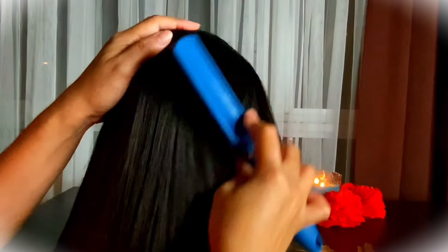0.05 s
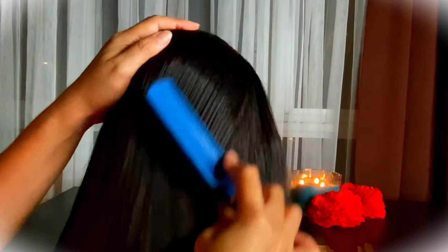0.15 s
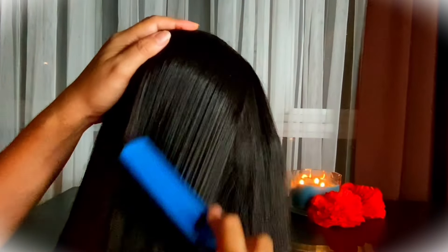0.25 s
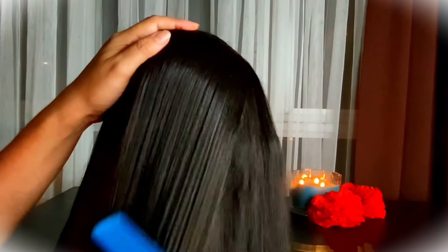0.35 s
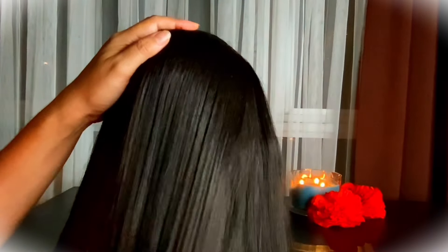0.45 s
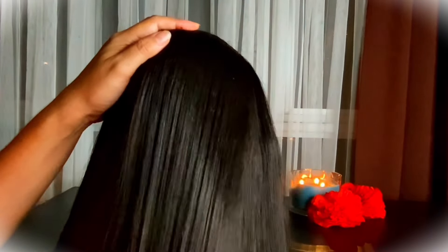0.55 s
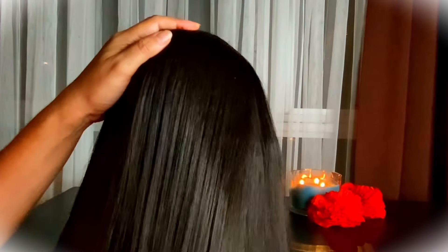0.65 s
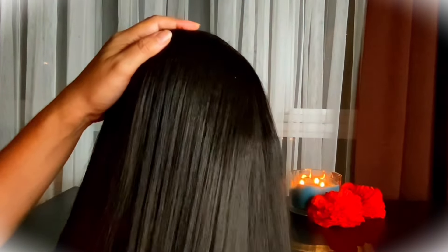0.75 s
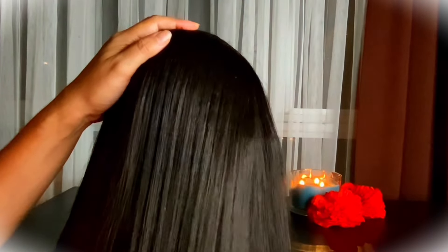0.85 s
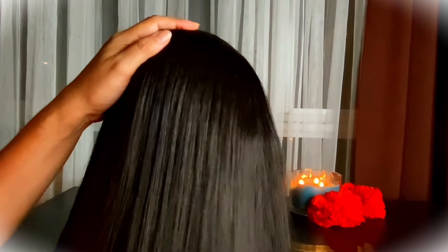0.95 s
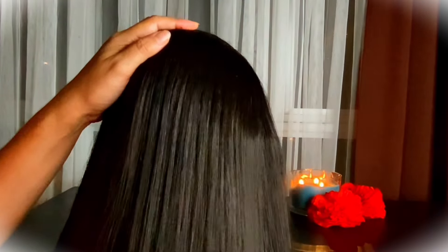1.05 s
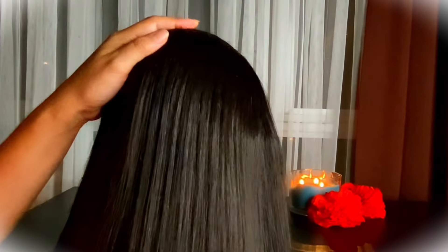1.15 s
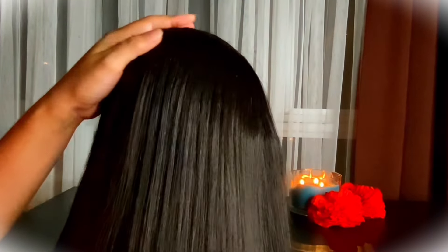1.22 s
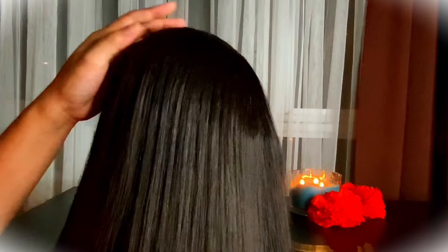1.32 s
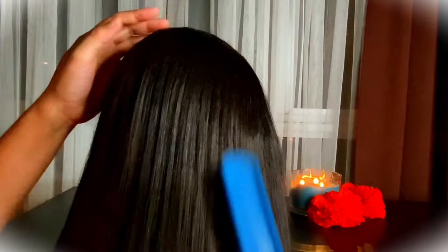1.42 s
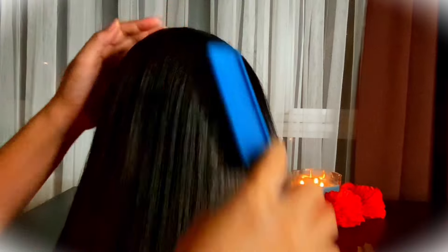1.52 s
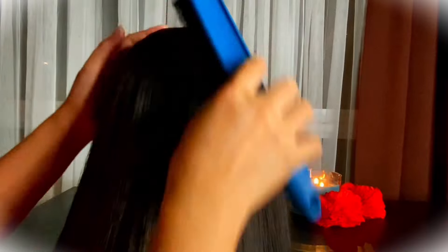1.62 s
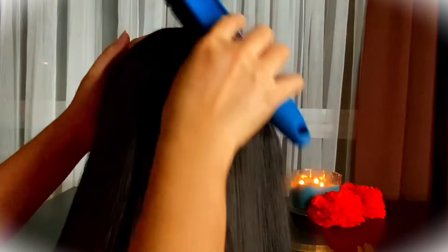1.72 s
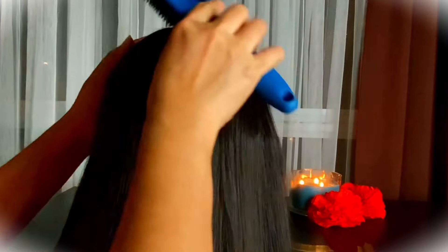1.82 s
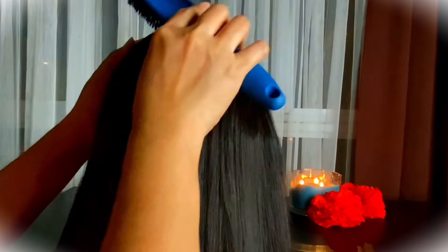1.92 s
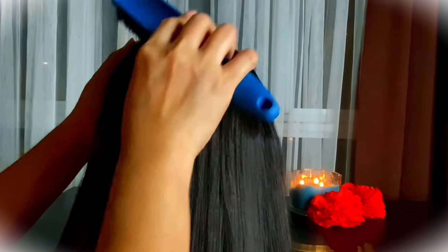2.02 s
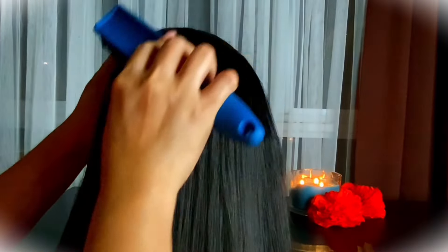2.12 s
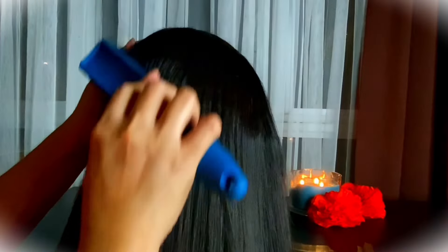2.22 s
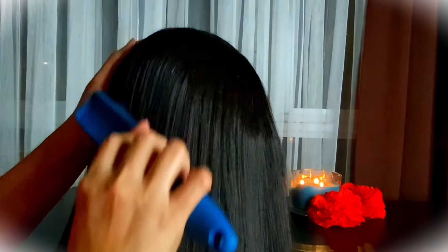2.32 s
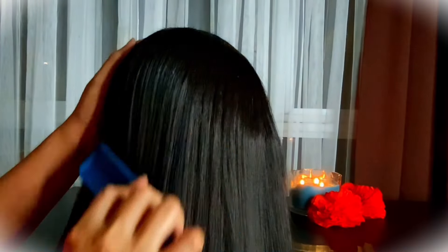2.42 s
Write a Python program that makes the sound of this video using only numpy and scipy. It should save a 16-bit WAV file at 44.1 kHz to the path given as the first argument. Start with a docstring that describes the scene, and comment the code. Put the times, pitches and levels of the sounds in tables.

```python
"""A quiet room, with a plastic comb drawn through long hair close to a two-port microphone: the end of one
stroke, a fast sweep past the microphone, a faint brush of the hand, a pause and the start of the next stroke.
Strands slip off the teeth as a grainy hiss made of short decaying sines and noise, which also drives the comb's
rasp; snagged teeth tick as scratches that ring the comb's modes. Stirred air buffets the ports as low noise,
flutter and sharp pressure puffs, over a steady microphone hiss."""
import sys
import numpy as np
from scipy import signal
from scipy.fft import rfft, irfft, next_fast_len
from scipy.io import wavfile
from scipy.ndimage import map_coordinates

SR = 44100
rng = np.random.default_rng(int(sys.argv[2]) if len(sys.argv) > 2 else 0)


def log_audio(samples):
    """Write samples as a 16-bit WAV file to the path given in sys.argv[1]."""
    # one column per channel
    frames = np.atleast_2d(samples).T
    # limit to full scale, then quantise
    limited = np.clip(frames, -1, 1)
    pcm = np.round(limited * 32767).astype(np.int16)
    wavfile.write(sys.argv[1], SR, pcm)


N = 110250

# Spectrum of the microphone hiss. Each row: frequency in Hz, relative level in dB.
HUSH_SPECTRUM = [(350, -38), (600, -13), (800, 0), (918, -5.5), (2530, -10), (14400, -12.5), (15900, -18)]
# Air on the ports, before the trims in air(). Each row: time in seconds, low buffeting in dB, flutter in dB,
# flutter left over right in dB.
AIR_MOVES = [(0.0, -48, -53.5, 8.5), (0.03, -45.5, -59, 2), (0.15, -44, -48, -0.5), (0.24, -30.5, -49, 7),
             (0.28, -31.5, -43, -0.5), (0.3, -30.5, -39.5, 13), (0.33, -25, -36.5, 4),
             (0.36, -26.5, -36, 7), (0.395, -27, -36, 7), (0.42, -26, -38.5, 8), (0.45, -28, -39.5, 5),
             (0.48, -25, -41, 2), (0.51, -32.5, -44.5, 2), (0.55, -23, -40, 0), (0.61, -30.5, -47, -5),
             (0.63, -27, -45, 2), (0.68, -29, -46, 0), (0.705, -35, -52, 0), (0.73, -31, -48, 0),
             (0.78, -38, -51.5, -0.5), (0.82, -33, -51.5, -3.0), (0.855, -36, -46, 2.5),
             (0.875, -40, -51, 0), (0.9, -35, -52, 0), (0.93, -44, -57, 0), (0.966, -50, -61, 0),
             (1.01, -47, -58, 0), (1.06, -52, -60, 2), (1.12, -56, -66, 0), (1.19, -59, -70, 0),
             (1.225, -51, -62, 0), (1.3, -55, -65, 0), (1.89, -54.5, -68.5, 1.5), (1.93, -53.5, -66, 5.0),
             (1.99, -52, -60, 1), (2.06, -49, -53, 1), (2.14, -54, -58, 1), (2.23, -53, -54, 0.5),
             (2.32, -47, -55, 0), (2.36, -52, -57, 0), (2.44, -50, -59, 2), (2.5, -48, -56, 1.0)]
# Spectra of the low buffeting and of the flutter. Each row: frequency in Hz, relative level in dB.
BUFFET_SPECTRUM = [(8.8, -11), (15, 1), (59, -3.5), (70, -2.5), (108, -11.5), (160, -20), (210, -45),
                   (350, -120)]
FLUTTER_SPECTRUM = [(71, -32), (120, 0), (156, -3.5), (343, -11), (840, -27), (1200, -32), (1560, -45),
                    (2640, -120)]
# Sharp puffs on the ports. Each row: time in seconds, nominal width in ms, relative left pressure,
# relative right pressure.
AIR_PUFFS = [(.3105, 1.8, .05, .13), (.3335, .9, .1, .04), (.3378, 2.2, -.24, -.1), (.3422, .8, .13, .05),
             (.3582, .5, -.08, 0), (.3753, .5, .12, 0), (.391, .7, -.15, 0), (.3545, 2.6, .25, .12),
             (.363, 1.6, -.2, 0), (.3711, 1.3, .36, 0), (.3785, .5, .52, .08), (.3825, 2, -.1, -.2),
             (.3873, 1.4, .15, 0), (.4046, .7, .7, -.31), (.4092, 1.5, .26, .05), (.4257, .8, .18, 0),
             (.4494, .6, .36, -.2), (.4522, 2.2, .24, -.08), (.5337, 2.5, -.17, -.08),
             (.5597, 1.8, .08, .22)]
# Teeth snagging. Each row: start in seconds, peak in dB, pitch in Hz, scratch length in seconds (a 30 dB fall).
SNAGGED_TEETH = [(.4035, -31, 3100, .004), (.4487, -27, 5600, .006), (.503, -29, 3000, .004),
                 (.5203, -26, 3400, .004), (.5445, -29, 6000, .006), (.5590, -26, 7500, .005),
                 (.5733, -26, 5600, .004), (.606, -29, 6000, .006), (.6235, -32, 4200, .006),
                 (.652, -33, 4200, .005), (.6875, -35, 3500, .008), (.718, -36, 4500, .008),
                 (.7755, -38, 4200, .008), (.776, -40, 11000, .006), (.808, -44, 3100, .006),
                 (.856, -45, 2500, .008), (.965, -56, 2800, .012), (1.0095, -54, 3800, .02),
                 (1.885, -57, 1500, .01), (1.975, -50, 1500, .015), (2.0215, -47, 1400, .01),
                 (2.077, -42, 1700, .004), (2.0895, -43, 5600, .006), (2.0905, -39, 1600, .016),
                 (2.110, -45, 1500, .004), (2.1345, -47, 1500, .008), (2.155, -46, 1500, .005),
                 (2.1685, -46, 1500, .006), (2.174, -45, 2800, .008), (2.2475, -46, 1600, .01)]
# Ringing modes of the comb. Each row: frequency in Hz, bandwidth in Hz, mean level in dB.
COMB_MODES = [(1500, 300, -2), (2000, 500, -2), (3100, 800, 0), (4200, 900, 0), (5600, 1100, 0),
              (8000, 1800, 2), (12000, 3000, 3)]
# Spectra of the comb's rasp, the strand hiss and the top treble. Each row: frequency in Hz, relative dB per Hz.
RASP_SPECTRUM = [(290, -30), (450, -5.5), (651, -1.5), (960, -2.5), (1070, -2.5), (1270, -10), (1480, -2.5),
                 (1700, -7.5), (2000, -6), (2570, -11.5), (2800, -16), (3200, -17), (4160, -26),
                 (7040, -120)]
HISS_SPECTRUM = [(1290, -37), (2200, -11), (2500, -4.5), (3020, 2.5), (4890, 2.5), (6620, 4.5),
                 (10000, -1.5), (13000, -31), (22000, -120)]
TOP_SPECTRUM = [(5290, -13), (9000, 0), (13400, 4.5), (15200, 1.5), (15900, -18)]
# First stroke and sweep, a faint brush of the hand, the next stroke. Each row: time in seconds, comb rasp in
# dB, strand hiss in dB, top treble in dB, left over right in dB, place from 0 (up on the head) to 1 (at the
# microphone).
SWEEP_MOVES = [(0, -49.5, -45.5, -53.5, -3.5, 0.034), (.07, -51, -47, -50.5, -5, 0),
               (.138, -50, -48.5, -50.5, -3.5, 0.19), (.214, -65, -52.5, -53, -3.5, 0.25),
               (.29, -53.5, -48, -45.5, -3, 0.22), (.36, -49, -44, -44, 4.5, 0.24),
               (.41, -46, -42, -40, 5, 0.52), (.448, -52.5, -42, -41, 2, 0.97),
               (.478, -52.5, -44, -46.5, 0, 1), (.56, -49, -40, -44.5, -0.5, 0.92),
               (.628, -49, -45, -46, 0.5, 1), (.654, -57, -47, -49.5, 0, 1),
               (.664, -53, -49, -52.5, -0.5, 1), (.7, -59, -51.5, -60.5, 0.5, 1),
               (.76, -61, -56.5, -66.5, 0, 0.92), (.86, -64.5, -56.5, -81, -1, 1),
               (.89, -70, -61.5, -75, 0, 0.75), (.94, -80, -74.5, -78, 0, 0.5),
               (1.0, -79, -74, -96.5, 0, 0.74)]
SWISH_MOVES = [(1.13, -76, -91, -87, 0, 0.75), (1.21, -77, -74.5, -85, 0, 0.81), (1.3, -86, -86, -92, 0, 1)]
RESTART_MOVES = [(1.8, -81, -102, -100, 6, 0), (1.88, -69.5, -81, -96, -1, 0.028),
                 (1.955, -66.5, -71.5, -91, -4, 0), (1.98, -61, -63, -91, -4.5, 0),
                 (2.03, -58.5, -61.5, -75, -3, 0), (2.09, -54, -58, -64, -1.5, 0.075),
                 (2.13, -55.5, -60.5, -60, 0.5, 0.022), (2.2, -52.5, -54.5, -60.5, -1, 0.019),
                 (2.284, -55.5, -55.5, -53.5, 1, 0.078), (2.34, -64.5, -55.5, -54.5, 2, 0.28),
                 (2.424, -72, -55.5, -54, 1.5, 0.24), (2.5, -62.5, -55.5, -55, 5.5, 0.13)]
# How the ports pick up each place. Each row: frequency in Hz, likeness of the two ports from 0 to 1,
# phase of right against left in radians, left over right in dB, colour in dB.
PICKUP_ON_HEAD = [(900, 1, 1, 6, -1.5), (2110, 0.8, -0.36, 2, 0.5), (3120, 0.9, 1.8, -1, -2),
                  (4320, 0, -8, 5, -4), (5350, 0.3, 4.5, 9, 1.5), (5850, 0.4, -2.2, 0.5, 1.5),
                  (7030, 0.34, -2, -2.5, 0), (8350, 0.84, -3.5, 1, 5), (10000, 0.54, -3, 1, -6.5),
                  (13000, 1, -1, 8, -6), (15400, 0.75, 11.5, -7, -8)]
PICKUP_IN_FRONT = [(900, 1, 0.41, 1, 0.014), (2000, 1, 0, 0, 0), (5750, 1, 0, 0.16, 0),
                   (8000, 0.62, 0.032, 1, 0.02), (11800, 0.21, 1, 0.35, 0), (15000, 0.45, 0.43, 0.83, 0)]

HUSH_DB = -70
SHARED_AIR = 0.1  # share of the low buffeting's power common to both ports, before its lumps
PORT_DELAY_MS = 0.81  # a puff reaches the right port this much later
PUFF_POINT = 1.8  # 2 is a rounded crest, 1 a sharp one
OFF_PITCH_DB = 34  # loss of a mode one octave from the snag's pitch
SCRATCH = 0.18  # noise in a snag, against a first click of 1
SLIPS_PER_S, SLIP_SPREAD_DB = 4000, 3
SLIP_CYCLES = 2.15  # a slip falls by a factor of e in half this many cycles
HEAD_GRAIN, FRONT_GRAIN = 0.27, 0.36  # share of slips in the friction noise
# Strands catching on the teeth: rate, size over the steady rub, fade in seconds.
CATCHES_PER_S, CATCH_DB, CATCH_FADE_S = 160, -10.5, 0.0034
TOP_HZ = 15870  # band limit


def amp(db):
    """Amplitude ratio of a level in dB."""
    return 10 ** (np.asarray(db) / 20)


def unit(x):
    """The sound scaled to rms 1 over all channels."""
    return x / np.sqrt(np.mean(x ** 2) + 1e-20)


def along(points, hz):
    """Value at each frequency, read between (Hz, value) points on a log axis."""
    f, v = np.transpose(points)
    return np.interp(np.log(hz + 1), np.log(f + 1), v)


def curves(rows):
    """One value per sample for each column after the time."""
    s, *cols = np.transpose(rows)
    return [np.interp(np.arange(N) / SR, s, c) for c in cols]


def wobble(rate):
    """Two smooth random curves, with rate knots a second."""
    knots = rng.standard_normal((2, 1000))
    return np.array([map_coordinates(k, [np.arange(N) * rate / SR]) for k in knots])


def filtered(x, response):
    """The sound times a complex response of frequency."""
    m = next_fast_len(N + 8192)
    spectrum = rfft(x, m) * response(np.fft.rfftfreq(m, 1 / SR))
    return irfft(spectrum, m)[..., :N]


def coloured(x, spectrum):
    """The sound shaped by a spectrum, rms 1."""
    return unit(filtered(x, lambda hz: amp(along(spectrum, hz))))


def sides(pan_db):
    """Left and right gains for a level difference in dB."""
    return amp(np.array([pan_db, -pan_db]) / 2)


def hush():
    """Steady microphone hiss, independent at each port."""
    return amp(HUSH_DB) * coloured(rng.standard_normal((2, N)), HUSH_SPECTRUM)


def puffs():
    """Pressure pulses over a broad, weak opposite swell, later and wider at the right port."""
    out = np.zeros((2, N))
    t = np.arange(N) / SR
    for s, ms, left, right in AIR_PUFFS:
        for port, gain, at, wide in ((0, left, s, 0.79), (1, right, s + PORT_DELAY_MS / 1000, 1.37)):
            u = (t - at) / (wide * ms / 1000)
            crest = np.exp(-np.abs(u) ** PUFF_POINT * .6)
            swell = .2 * np.exp(-u ** 2 / 18)
            out[port] += gain * (crest - swell)
    return out


def air():
    """Lumpy turbulence from air pushed by the hand, different at each port, with a few sharp puffs."""
    low_db, flutter_db, pan_db = curves(AIR_MOVES)
    separate = rng.standard_normal((2, N))
    shared = np.sqrt(SHARED_AIR / (1 - SHARED_AIR)) * rng.standard_normal(N)
    low = unit(amp(2.2 * wobble(11.43)) * coloured(separate + shared, BUFFET_SPECTRUM))
    lumps = amp(2.47 * wobble(70))
    flutter = unit(lumps * coloured(rng.standard_normal((2, N)), FLUTTER_SPECTRUM))
    return amp(low_db + 2.5) * low + amp(flutter_db + 4.5) * flutter * sides(pan_db) + puffs()


def snags():
    """Each snag is a short scratch that rings the comb's modes, mostly those near its own pitch."""
    size = 1200  # samples in one tick
    out = np.zeros(N + size)
    t = np.arange(size) / SR
    for s, db, pitch, length in SNAGGED_TEETH:
        ring = np.zeros(size)
        for hz, width, level in COMB_MODES:
            mode_db = level - OFF_PITCH_DB * np.log2(hz / pitch) ** 2 + rng.normal(0, 1)
            ring += amp(mode_db) * np.sin(2 * np.pi * hz * t) * np.exp(-np.pi * width * t)
        rub = amp(-30 * t / length) * (SCRATCH * rng.standard_normal(size) + (t == 0))
        tick = np.convolve(rub, ring)[:size]
        start = round(s * SR)
        out[start:start + size] += amp(db) * tick / np.abs(tick).max()
    return out[:N]


def strands(grain):
    """Strands on the teeth: dense short slips of random pitch and uneven size over smooth friction noise."""
    at, pitch, size = rng.random((3, 20000))[:, :int(SLIPS_PER_S * N / SR)]
    hz = 600 * (16000 / 600) ** pitch[:, None]  # 600 Hz to 16 kHz
    step = np.arange(128)
    t = step / SR
    size_db = SLIP_SPREAD_DB * np.minimum(-np.log(size), 3.5)[:, None]
    # Higher slips are shorter, so they are made stronger to keep the mix nearly white.
    grains = amp(size_db) * hz * np.sin(2 * np.pi * hz * t) * np.exp(-hz * t * 2 / SLIP_CYCLES)
    where = (at * N).astype(int)[:, None] + step
    slips = np.bincount(where.ravel(), grains.ravel(), N + 128)[:N]
    share = np.clip(grain, 0, 1)
    friction = np.sqrt(share) * unit(slips) + np.sqrt(1 - share) * rng.standard_normal(N)
    return friction * amp(0.22 * wobble(70)[0])


def placed(pickup, grain):
    """Strand noise from one place: a part common to both ports, with a phase shift, and a separate part at each."""
    hz, *cols = np.transpose(pickup)
    alike, phase, pan_db, colour_db = [list(zip(hz, c)) for c in cols]

    def gain(f):
        return amp(along(colour_db, f)) * sides(along(pan_db, f))

    def likeness(f):
        return np.clip(along(alike, f), 0, 1)

    def common(f):
        turn = np.exp(np.outer([-.5j, .5j], along(phase, f)))
        return gain(f) * np.sqrt(likeness(f)) * turn

    def separate(f):
        return gain(f) * np.sqrt(1 - likeness(f))

    both = filtered(strands(grain), common)
    return both + filtered(np.array([strands(grain), strands(grain)]), separate)


def catches():
    """Gain of the rub: it jumps whenever strands catch at random, then fades."""
    at, size = rng.random((2, 1000))[:, :int(CATCHES_PER_S * N / SR)]
    jumps = np.bincount((at * N).astype(int), -np.log(size), N)
    fade = np.exp(-np.arange(2000) / SR / CATCH_FADE_S)
    return unit(1 + amp(CATCH_DB) * signal.fftconvolve(jumps, fade)[:N])


def comb():
    """One strand excitation drives rasp, hiss and top treble as the comb moves between head and microphone."""
    rows = []
    for part in (SWEEP_MOVES, SWISH_MOVES, RESTART_MOVES):
        # Each part fades in and out over 50 ms.
        before = (part[0][0] - .05, -100, -100, -100, 0, 0)
        after = (part[-1][0] + .05, -100, -100, -100, 0, 0)
        rows += [before, *part, after]
    rasp_db, hiss_db, top_db, pan_db, place = curves(rows)
    place = np.clip(place, 0, 1)
    on_head = np.sqrt(1 - place) * placed(PICKUP_ON_HEAD, HEAD_GRAIN)
    in_front = np.sqrt(place) * placed(PICKUP_IN_FRONT, FRONT_GRAIN)
    rub = (on_head + in_front) * catches()
    rasp = amp(rasp_db) * coloured(rub, RASP_SPECTRUM)
    hiss = amp(hiss_db) * coloured(rub, HISS_SPECTRUM)
    top = amp(top_db) * coloured(rub, TOP_SPECTRUM)
    return (rasp + hiss + top) * sides(pan_db)


def scene():
    """The comb's strokes, snagging teeth, stirred air and microphone hiss together."""
    return comb() + snags() + air() + hush()


def record(dry):
    """Nothing is kept above the band limit."""
    return filtered(dry, lambda hz: hz < TOP_HZ)


dry = scene()
out = record(dry)
log_audio(out)
```